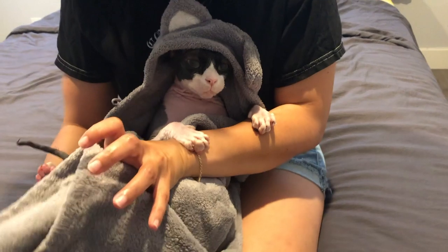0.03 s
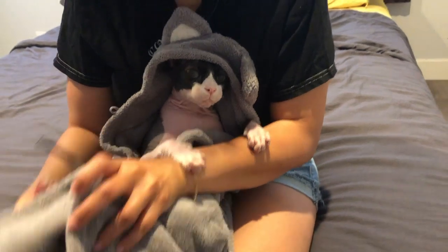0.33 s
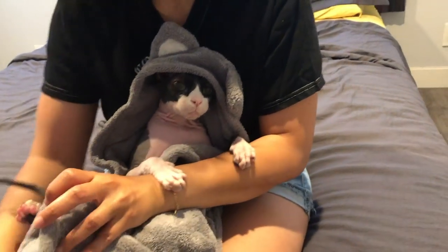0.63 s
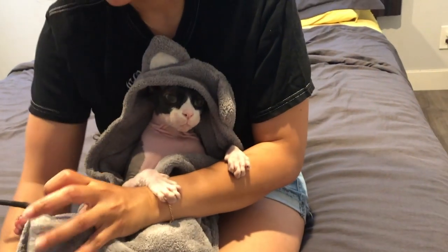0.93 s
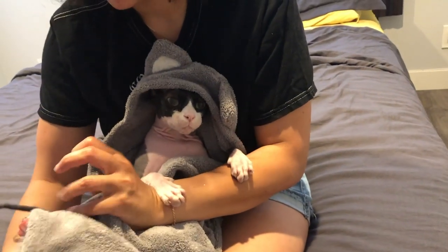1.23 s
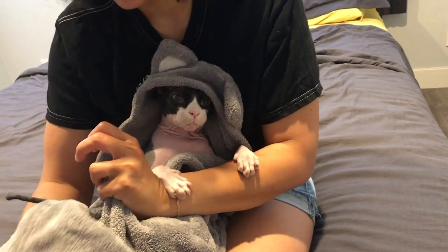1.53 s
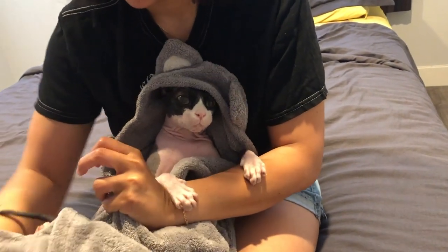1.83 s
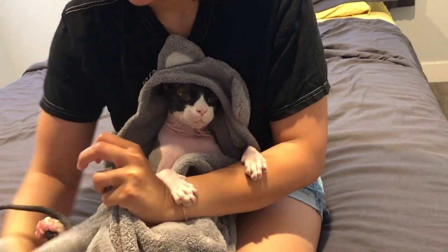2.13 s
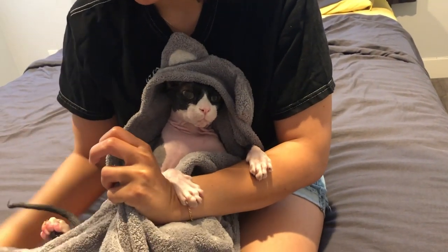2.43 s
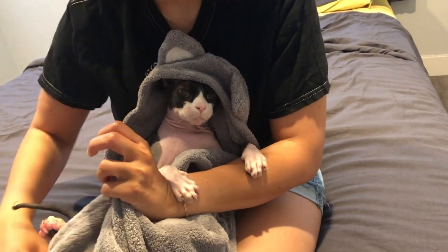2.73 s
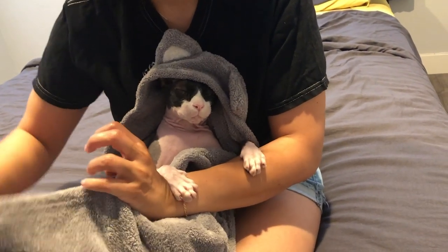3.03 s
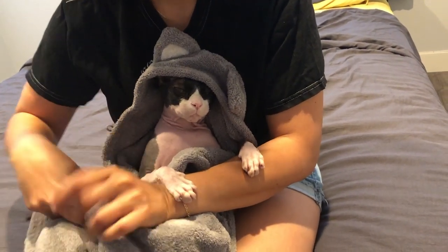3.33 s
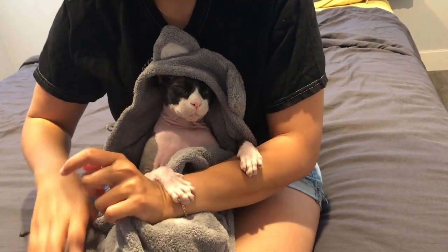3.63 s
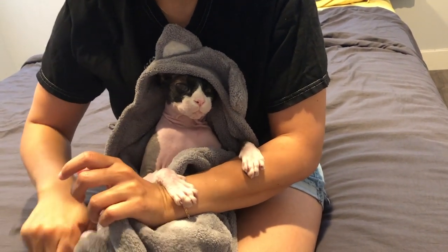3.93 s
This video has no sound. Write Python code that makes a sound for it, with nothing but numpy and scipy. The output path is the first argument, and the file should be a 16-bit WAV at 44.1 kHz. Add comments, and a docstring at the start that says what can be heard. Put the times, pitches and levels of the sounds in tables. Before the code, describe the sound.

Soft rubbing of a plush towel, a short early bump, and a fan humming behind.

```python
"""A small, quiet bedroom, one microphone close to the bed, where hands rub and rearrange a plush towel.
Each stroke is a dull drag, a swish and the fine hiss of fibres that catch and let go.
Among the strokes come a few padded bumps of the hands and one small tick.
Farther back a fan motor hums steadily over a low rush of air;
the recorder's noise suppression, starting up, fades the hum in over the first half second."""
import sys
import numpy as np
from scipy import signal
from scipy.fft import rfft, irfft, next_fast_len
from scipy.io import wavfile
from scipy.ndimage import map_coordinates

SR = 44100
rng = np.random.default_rng(int(sys.argv[2]) if len(sys.argv) > 2 else 0)


def wrap_up_sound(samples):
    """Save the sound to the file named by the first command line argument, as 16-bit audio."""
    columns = np.atleast_2d(samples).T
    # keep every value between -1 and 1, then stretch to whole-number steps
    tamed = np.clip(columns, -1, 1)
    steps = np.round(tamed * 32767).astype(np.int16)
    wavfile.write(sys.argv[1], SR, steps)


N = 176400


# Strokes at the microphone: (peak time [s], rise [s], fall [s], drag [dB], swish [dB], fibre hiss [dB])
STROKES = [ (.085, .06, .03, -63.5, -74, -72), (.265, 0.065, .028, -63, -65, -77),
           (.405, 0.026, .02, -65.5, -79, -68), (.49, .045, 0.056, -65, -68.5, -73),
           (.535, 0.018, 0.073, -66.5, -71, -66), (.73, 0.042, .04, -79, -68.5, -69),
           (.985, 0.026, 0.041, -66, -69.5, -66.5), (1.16, 0.049, .025, -68, -71.5, -68.5),
           (1.21, .018, 0.024, -65.5, -64, -60.5), (1.285, 0.019, 0.022, -67, -64, -61),
           (1.40, 0.014, 0.023, -68, -71, -68.5), (1.545, 0.043, .045, -69, -68, -73),
           (1.685, 0.017, 0.018, -63.5, -69, -70), (1.737, 0.017, 0.016, -63, -59.5, -61),
           (1.78, .016, 0.029, -78, -66, -62.5), (2.05, 0.03, 0.026, -70, -75, -73),
           (2.113, 0.024, 0.02, -63, -70, -62), (2.19, 0.023, 0.029, -62.5, -64.5, -62.5),
           (2.335, .018, 0.028, -71, -69.5, -66), (2.40, 0.02, 0.049, -71.5, -67, -67.5),
           (3.09, 0.044, .035, -76, -71.5, -75), (3.209, 0.028, 0.028, -69, -70, -68),
           (3.40, 0.025, .03, -71, -72.5, -72.5), (3.55, .04, 0.016, -77, -73, -74),
           (3.81, .02, 0.024, -66, -70, -74), (3.893, .035, .02, -67, -67, -63),
           (3.96, 0.02, 0.053, -69, -69.5, -68.5), ]
# Spectra of the dull drag, the swish and the fibre hiss: (frequency [Hz], relative level [dB])
DRAG_SPECTRUM = [(300, -5), (600, 1), (1200, -1), (1900, -1.5), (3000, -12.5), (6000, -33), (16000, -36)]
SWISH_SPECTRUM = [(600, -18), (1500, -6), (2600, 2), (3500, 1), (5200, -3), (8000, -14.5), (15500, -30)]
FIBRE_SPECTRUM = [(600, -14), (1500, -17), (3200, -4.5), (5000, -1.5), (6500, 1), (8800, 0.5), (11500, -4),
                  (13500, -8), (15500, -8)]

def towel(grip_db=1.13, grip_per_s=110):
    """Close up, each stroke swells and fades in three layers of friction, roughened by uneven grip."""
    t = np.arange(N) / SR
    powers = np.zeros((3, N))
    for peak, rise, fall, *levels_db in STROKES:
        swell = np.exp(-.5 * ((t - peak) / np.where(t < peak, rise, fall)) ** 2)
        powers += amp(levels_db)[:, None] ** 2 * swell
    spectra = (DRAG_SPECTRUM, SWISH_SPECTRUM, FIBRE_SPECTRUM)
    cloth = sum(np.sqrt(power) * friction(spectrum) for power, spectrum in zip(powers, spectra))
    return cloth * amp(grip_db * wobble(grip_per_s))


def friction(spectrum, snags_per_s=3000, scatter_db=5, snag_db=-5):
    """Smooth sliding noise with tiny snags, where fibres catch and let go."""
    caught = rng.random(N) < snags_per_s / SR
    snags = caught * np.sign(rng.standard_normal(N)) * amp(scatter_db * rng.standard_normal(N))
    sliding = rng.standard_normal(N)
    return coloured(sliding + amp(snag_db) * unit(snags), spectrum)


# Hands bumping the bed, close by; the last row is the low body of the tick: (time [s], gain [dB], body pitch
# [Hz], decay t60 [s])
BUMPS = [(.085, -46.5, 423, 0.054), (.3193, -15, 340, 0.012), (2.764, -41, 510, 0.042)]

def bumps(attack_s=0.0023, glide_hz=950, glide_s=0.0008):
    """Each contact starts high and drops quickly in pitch as it sinks into the padding."""
    sound = np.zeros(N)
    for start, db, body_hz, t60 in BUMPS:
        t = time_since(start)
        cycles = body_hz * t + glide_hz * glide_s * (1 - np.exp(-t / glide_s))
        onset = 1 - np.exp(-(t / attack_s) ** 2)
        sound += amp(db) * onset * decay(t, t60) * np.sin(2 * np.pi * cycles)
    return sound


# Modes of the nearby tick: (frequency [Hz], relative level [dB], decay t60 [s])
TICK_MODES = [(2800, 2, 0.0036), (5600, -2, 0.0032), (8240, -1.5, .0035)]

def tick(start_s=2.7637, attack_s=0.00016, gain_db=-44):
    """One tick as of a fingernail: damped modes set off together."""
    t = time_since(start_s)
    onset = 1 - np.exp(-t / attack_s)
    ringing = sum(amp(db) * decay(t, t60) * np.sin(2 * np.pi * hz * t) for hz, db, t60 in TICK_MODES)
    return amp(gain_db) * onset * ringing


# Hum of the fan motor, farther back: (harmonic [number], steady level [dB], waver [dB])
MOTOR_HARMONICS = [(1, -48.5, 0.38), (2, -62.5, 0.5), (3, -83, 5.5)]

def fan_motor(hum_hz=292.85, wander_hz=0.16, fade_in_s=0.46, suppression_db=-7, flat_hz=1.98):
    """A steady motor hum; the recorder's noise suppression fades it in, slightly flat at first."""
    suppression = np.clip(1 - np.arange(N) / SR / fade_in_s, 0, 1)
    pitch_hz = hum_hz - flat_hz * suppression + wander_hz * wobble(2.07)
    hum = sum(wavering(db, waver_db) * sine(k * pitch_hz) for k, db, waver_db in MOTOR_HARMONICS)
    return hum * amp(suppression_db * suppression)


# Weaker tones from the same fan: (frequency [Hz], level [dB], waver [dB])
FAN_TONES = [(60.1, -69.5, 2), (168.7, -67, 2.5), (192.3, -63.5, 1.5), (212.5, -64.5, 3), (353, -59.5, 2.5),
             (773, -80.5, -2)]
# The motor's whine, barely reaching the microphone: (frequency [Hz], level [dB])
MOTOR_WHINE = [(3122, -90), (5143, -89.5)]

def fan_tones(wander_hz=1.27):
    """Wavering fan tones and a faint, even whine, each drifting a little in pitch."""
    def tone(hz):
        return sine(hz + wander_hz * wobble(7))
    tones = sum(wavering(db, waver_db) * tone(hz) for hz, db, waver_db in FAN_TONES)
    whine = sum(amp(db) * tone(hz) for hz, db in MOTOR_WHINE)
    return tones + whine


# Room tone all around the microphone: (frequency [Hz], relative level [dB])
AIR_SPECTRUM = [(20, -32), (34, -30), (50, 2.5), (63, -4), (75, -3), (100, 0.5), (150, 5.5), (230, 1.5),
                (320, 1), (375, 0.5), (440, -6.5), (560, -9.5), (700, -11.5), (1200, -16.5), (2400, -22.5),
                (4200, -26), (5300, -25.5), (7000, -28), (8800, -30), (12000, -33.5), (15500, -36.5)]

def air(level_db=-54):
    """The steady rush of ventilation and room hiss."""
    return coloured(rng.standard_normal(N), AIR_SPECTRUM) * amp(level_db)


def bedroom(direct, t60_s=0.13, tail_db=-14):
    """At close range the direct sound leads, with a short, weak tail from the room."""
    t = np.arange(SR // 2) / SR
    tail = rng.standard_normal(len(t)) * decay(t, t60_s)
    return direct + amp(tail_db) * signal.fftconvolve(direct, tail / np.linalg.norm(tail))[:N]


def amp(db):
    """Decibels to gain."""
    return 10 ** (np.asarray(db) / 20)


def unit(x):
    """Scale to rms 1."""
    return x / np.sqrt(np.mean(x ** 2) + 1e-20)


def time_since(start):
    """Seconds since start, zero before it."""
    return np.maximum(np.arange(N) / SR - start, 0)


def decay(t, t60):
    """A fall of 60 dB every t60 seconds."""
    return np.exp(-np.log(1000) * t / t60)


def sine(hz):
    """A sine at rms 1 that follows a frequency curve."""
    return np.sqrt(2) * np.sin(2 * np.pi * np.cumsum(hz) / SR)


def wobble(rate):
    """A smooth random curve, rate knots a second."""
    knots = rng.standard_normal(int(N * rate / SR) + 4)
    return map_coordinates(knots, [np.arange(N) * rate / SR])


def wavering(db, waver_db, per_s=7):
    """A gain that strays randomly around a level."""
    return amp(db + waver_db * wobble(per_s))


def filtered(x, response):
    """Filter x by a gain given as a function of frequency."""
    size = next_fast_len(N + SR // 2)
    return irfft(rfft(x, size) * response(np.fft.rfftfreq(size, 1 / SR)), size)[:N]


def coloured(x, spectrum):
    """x shaped by (Hz, dB) points on a log axis, at rms 1."""
    points_hz, db = np.transpose(spectrum)
    return unit(filtered(x, lambda hz: amp(np.interp(np.log(hz + 1), np.log(points_hz), db))))


def scene():
    """Towel and hands close to the microphone, fan and air behind, in mono."""
    close = bedroom(towel() + bumps() + tick())
    background = fan_motor() + fan_tones() + air()
    return (close + background)[None]


def record(dry):
    """The recorder keeps nothing above its band limit."""
    top_hz = 15720
    return filtered(dry[0], lambda hz: hz < top_hz)[None]


dry = scene()
out = record(dry)
wrap_up_sound(out)
```